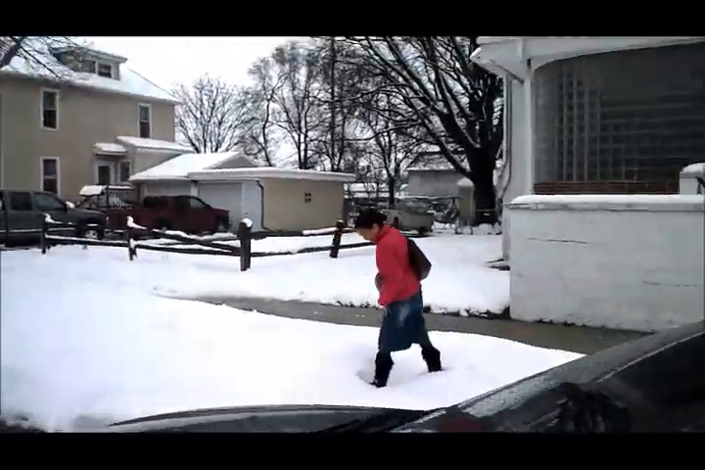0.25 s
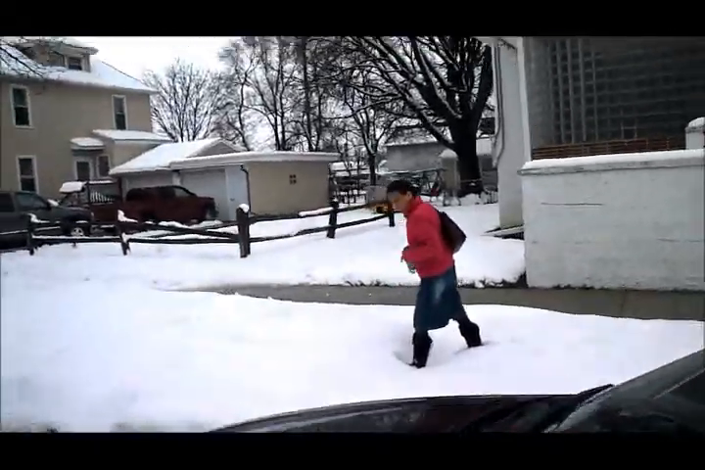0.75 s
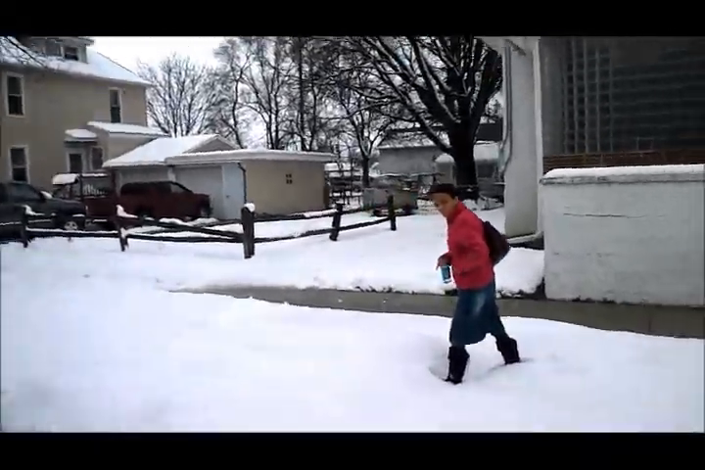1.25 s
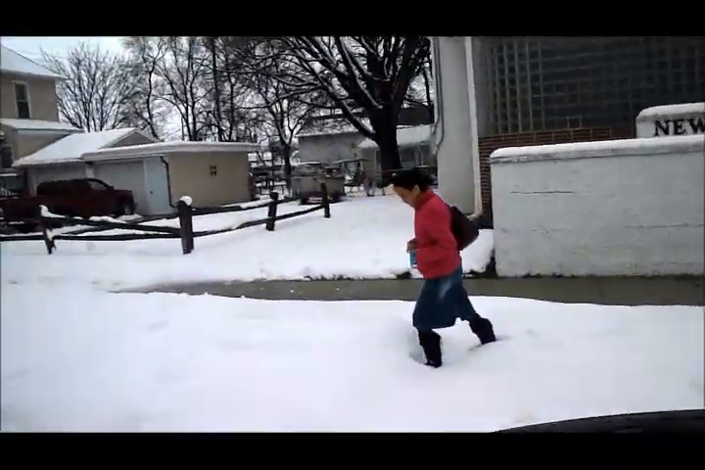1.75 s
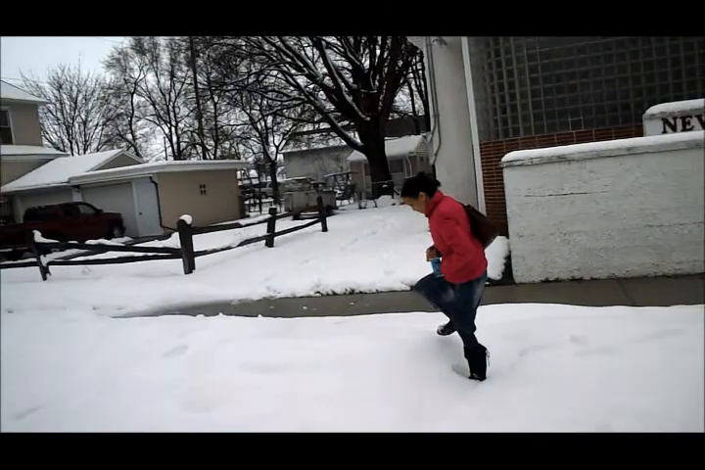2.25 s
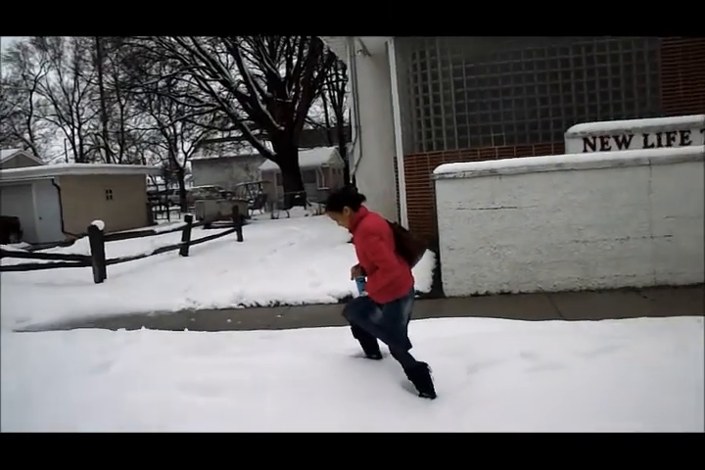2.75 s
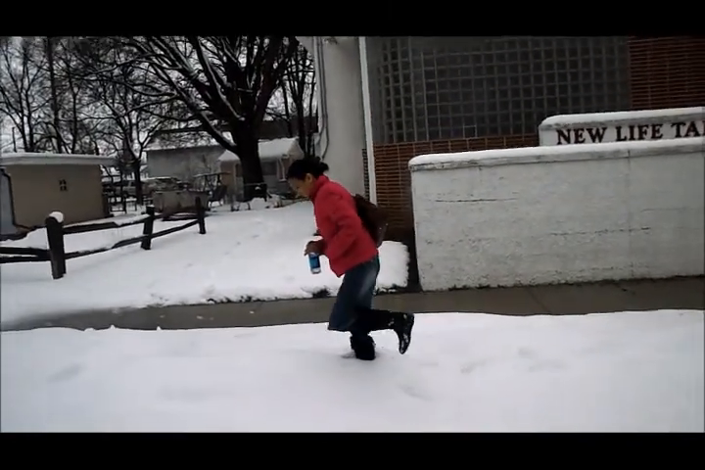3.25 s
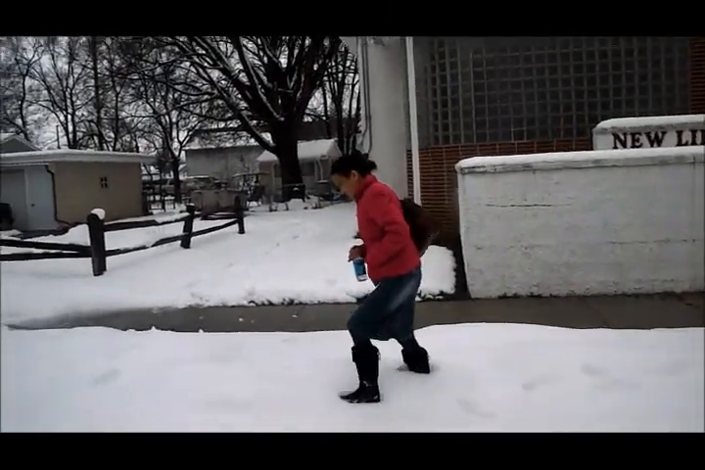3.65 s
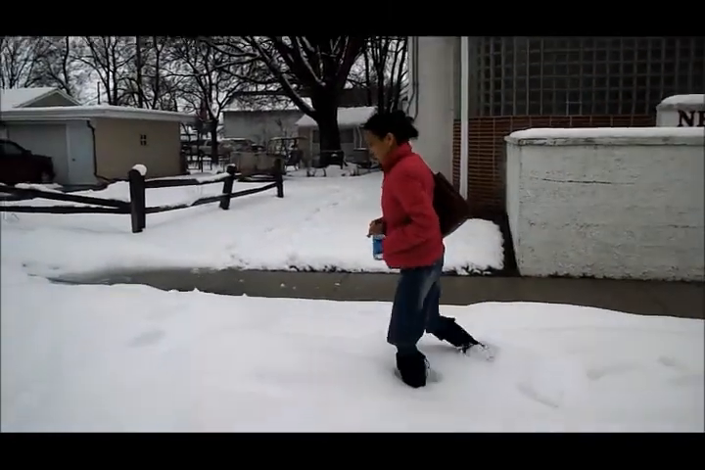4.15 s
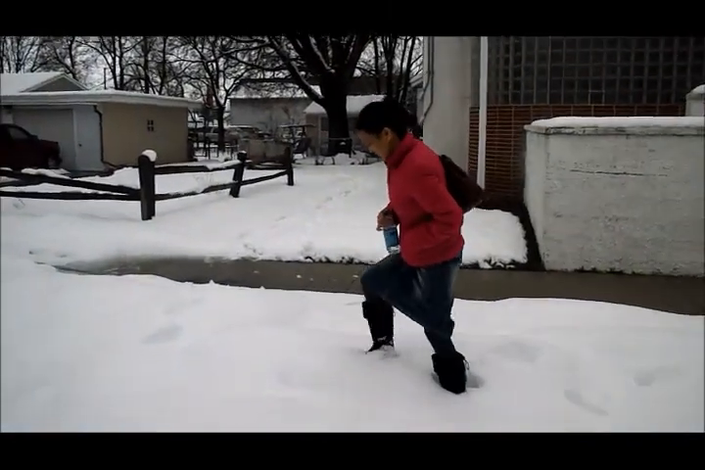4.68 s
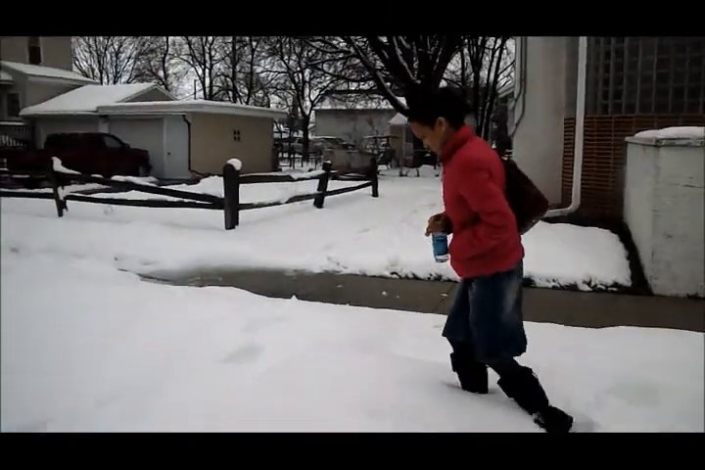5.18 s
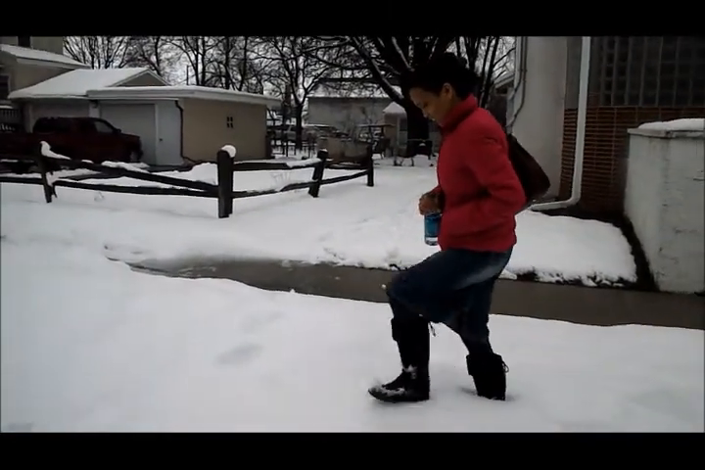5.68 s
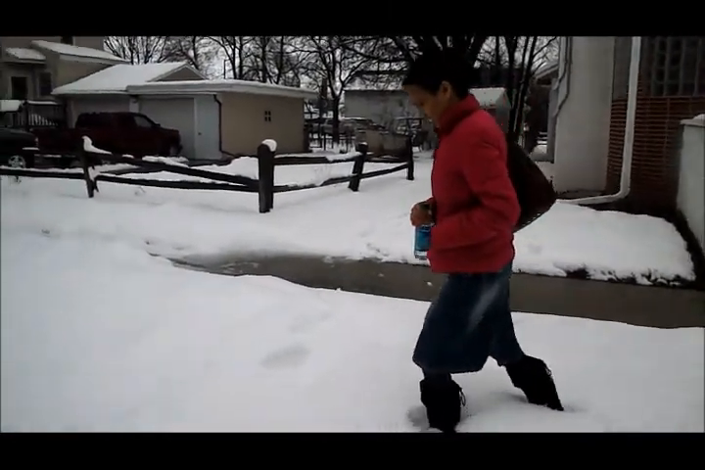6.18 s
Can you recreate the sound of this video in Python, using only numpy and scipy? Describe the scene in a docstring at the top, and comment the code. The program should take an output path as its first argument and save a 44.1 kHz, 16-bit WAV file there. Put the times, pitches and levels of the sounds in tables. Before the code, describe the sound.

A quiet snowy yard heard through a small hand-held mono microphone, with constant soft hiss, little bass and a very faint, thin high whine. At 0 s a distant bird slurs downward, followed by short chirps at 0.2-0.4 s and rising whistles until about 0.7 s, lightly echoing; weaker whistles come near 1.4 s. Boots crunch softly in snow around 0.15, 1.2-1.7, 1.8, 2.2, 2.6 and 2.9 s, grainy and muffled. A faint low hum swells in and out between 0.7 and 2 s. Close plastic case ticks punctuate everything: a strong click at 1.43 s, others near 2.1, 2.3, 3.6, 4.4, 5.5 and 5.9 s. From 4 s birds return with chirps, a whistle and another falling slur at 5 s, fading by 5.6 s. Fingers rub the case faintly from 4.7 s, then scratch more sharply at 5.4 and 6.2 s. A last tick comes at 6.4 s.

```python
"""A quiet yard in deep snow, heard through a hand-held camera: boots crunch softly as swarms of grains.
Close by, the plastic case ticks as struck decaying modes and rubs under the fingers as ringing jerks.
Far birds slur, chirp and whistle as gliding sines with echoes; narrow noise makes a low hum that comes
and goes. The mono microphone adds shaped hiss, and the electronics a thin chopped sine whine."""
import sys
import numpy as np
from scipy import signal
from scipy.fft import rfft, irfft
from scipy.io import wavfile
from scipy.ndimage import uniform_filter1d

SR = 44100
rng = np.random.default_rng(int(sys.argv[2]) if len(sys.argv) > 2 else 0)


def generate_wav(sig):
    """Save sig (samples, or channels by samples) to the path in sys.argv[1] as 16-bit PCM at SR."""
    pcm = np.round(np.clip(np.atleast_2d(sig).T, -1, 1) * 32767).astype(np.int16)
    wavfile.write(sys.argv[1], SR, pcm)


N = 283154
TIME = np.arange(N) / SR


def undb(db):
    """Decibels to gain."""
    return 10 ** (np.asarray(db) / 20)


def level(x, db):
    """Scale to an rms level in dB."""
    return x * undb(db) / np.sqrt(np.mean(x ** 2) + 1e-18)


def add(out, s, x):
    """Mix x into out from time s (seconds) on."""
    i = max(int(s * SR), 0)
    out[i:i + len(x)] += x[:max(len(out) - i, 0)]


def colour(x, points):
    """Filter by a (Hz, dB) outline, joined up along log frequency."""
    hz, db = np.transpose(points)
    f = np.maximum(np.fft.rfftfreq(len(x), 1 / SR), 1)
    gain = undb(np.interp(np.log(f), np.log(hz), db))
    return irfft(rfft(x) * gain, len(x))


def resonate(x, hz, width):
    """One steep-sided resonance, gain 1 at its centre: a peak of this width in Hz, passed twice."""
    b, a = signal.iirpeak(hz, hz / width, fs=SR)
    once = signal.lfilter(b, a, x)
    return signal.lfilter(b, a, once)


def walk(rate):
    """Slow random drift around 0 with a spread near 1, heading for `rate` new values a second."""
    k = int(SR / rate)
    held = np.repeat(rng.standard_normal(N // k + 1), k)
    return uniform_filter1d(held, k)[:N]


def grains(n, rate, spread_db):
    """Random tiny impulses, `rate` a second on average, most weak and a few strong."""
    struck = rng.random(n) < rate / SR
    strength = undb(spread_db * np.minimum(rng.exponential(size=n), 4))
    return struck * rng.choice([-1, 1], n) * strength


def arch(length):
    """Progress 0-1 through an event of this many seconds, and a rounded swell over it."""
    u = np.linspace(0, 1, max(int(length * SR), 8))
    return u, np.abs(np.sin(np.pi * u))


def note(hz, swell, db, waver=0.00403, flutter_db=2):
    """One pure bird note; its pitch wavers slightly and its level flutters on the way through the air."""
    hz = hz * (1 + waver * walk(200)[:len(hz)])
    swell = swell * undb(flutter_db * walk(60)[:len(hz)])
    return np.sqrt(2) * undb(db) * swell * np.sin(2 * np.pi * np.cumsum(hz) / SR)


def bird_calls():
    """Pure gliding notes: long downward slurs, short chirps and rising whistles."""
    # A bird's long downward slurs. Each row: reference time in seconds, level in dB.
    slurs = [(-0.012, -41.5), (5.008, -42.5)]
    # Every slur hangs high, drops fast and settles.
    # Each row: seconds from the reference time, pitch in Hz, level in dB relative to the slur's.
    slur_shape = [(-0.05, 4880, -9), (-0.012, 4670, -4), (0.018, 4560, -13), (0.04, 4480, 3.5),
                  (0.056, 4060, -1), (0.075, 3650, -14.5), (0.11, 3300, -10), (0.135, 3280, -8.5),
                  (0.16, 3250, -13)]
    # Short chirps. Each row: start in seconds, length in seconds, starting pitch in Hz,
    # glide in octaves, level in dB.
    chirps = [(0.24, 0.022, 4400, -0.21, -46), (0.349, 0.024, 4920, -0.21, -36),
              (4.013, 0.029, 4500, -0.256, -48), (4.37, 0.058, 4640, -0.25, -38),
              (4.575, 0.042, 4038, -0.22, -46), (5.266, 0.044, 3150, -0.28, -49.5),
              (5.342, 0.06, 2313, 0.47, -45)]
    chirp_bend = 1.57  # a chirp's glide steepens as it goes
    # Rising whistles. Each row: start in seconds, length in seconds, starting pitch in Hz,
    # rise in octaves, level in dB.
    whistles = [(0.465, 0.04, 3176, 0.01, -45.5), (0.526, 0.16, 3300, 0.16, -46.5),
                (0.602, 0.125, 3303, 0.1, -39), (1.415, 0.057, 3285, 0.03, -49),
                (1.479, 0.071, 3053, 0.058, -53.5), (4.659, 0.111, 3160, 0.047, -50.5),
                (5.485, 0.14, 3170, 0.01, -59)]
    whistle_ease, whistle_late = 2.4, 2.65  # the rise levels off; the loudness comes late

    out = np.zeros(N)
    at, pitch_hz, shape_db = np.transpose(slur_shape)
    for s, db in slurs:
        t = TIME - s
        swell = np.interp(t, at, undb(shape_db), left=0, right=0)
        out += note(np.interp(t, at, pitch_hz), swell, db)
    for s, length, hz, glide_oct, db in chirps:
        u, swell = arch(length)
        pitch = hz * 2 ** (glide_oct * u ** chirp_bend)
        add(out, s, note(pitch, swell ** 0.99, db))
    for s, length, hz, rise_oct, db in whistles:
        u, _ = arch(length)
        swell = np.abs(np.sin(np.pi * u ** whistle_late)) ** 0.44
        pitch = hz * 2 ** (rise_oct * (1 - (1 - u) ** whistle_ease))
        add(out, s, note(pitch, swell, db))
    return out


def birds(wall_s=0.022, wall_db=-12, echo_db=-5, echo_t60=0.69):
    """The calls, thrown back once by a house wall and scattered by the trees into a decaying noise tail."""
    calls = bird_calls()
    t = TIME[:SR // 2]
    trees = rng.standard_normal(len(t)) * np.exp(-np.log(1000) * t / echo_t60)
    scattered = signal.fftconvolve(calls, trees / np.linalg.norm(trees))[:N]
    heard = calls + undb(echo_db) * scattered
    add(heard, wall_s, undb(wall_db) * calls)
    return heard


def air(hiss_db=-44.8, port_hz=1980, port_width_hz=480, port_db=-52.0):
    """Outdoor air and microphone hiss, with a hump where the microphone's port resonates."""
    # Colour of the hiss. Each row: frequency in Hz, relative density in dB.
    hiss_colour = [(25, -55.5), (60, -32.5), (125, -26), (260, -18), (480, -11), (780, -6), (1400, -4.5),
                   (2700, -8.5), (3600, -6), (4700, -2), (5500, -5.5), (6500, -4), (7800, -9),
                   (10100, -9.5), (11000, -20)]
    hiss = level(colour(rng.standard_normal(N), hiss_colour), hiss_db)
    port = resonate(rng.standard_normal(N), port_hz, port_width_hz)
    return (hiss + level(port, port_db)) * undb(0.23 * walk(5.7))  # the level drifts very slightly


def whine(hz=10740, chop_hz=81.7, line_db=-70):
    """A thin sine from the camera's electronics, chopped at a steady rate."""
    chop = 1 + np.cos(2 * np.pi * chop_hz * TIME)
    return np.sqrt(2) * undb(line_db) * chop * np.sin(2 * np.pi * hz * TIME)


def boots():
    """Snow crystals break in a swarm as the weight comes onto each boot."""
    # A boot packs the snow. Each row: start in seconds, length in seconds, level in dB.
    steps = [(0.152, 0.13, -55.5), (1.181, 0.52, -53.5), (1.818, 0.026, -45.5), (2.181, 0.0304, -47),
             (2.233, 0.05, -46), (2.596, 0.312, -52), (2.92, 0.24, -48)]
    # Colour of packing snow. Each row: frequency in Hz, relative level in dB.
    snow = [(30, -53), (100, -24), (300, -17.5), (550, -1.5), (850, 1.5), (1300, -0.5), (2200, -11.5),
            (4500, -16), (10000, -28)]
    weight = np.zeros(N)
    for s, length, db in steps:
        u, _ = arch(length)
        press = np.abs(np.sin(np.pi * u ** 1.246)) ** 0.487  # peaks a little past the middle
        add(weight, s, undb(db) * press)
    crunch = level(colour(grains(N, rate=1600, spread_db=2.5), snow), 0)
    return weight * crunch * undb(4.1 * walk(70))  # the snow gives way in fits


def case_ticks(rebound_s=0.000836, rebound=0.387, low_hz=600, skirt_db_per_oct=19.5, round_oct=0.36,
               snap_top_hz=8600, thud_hz=890, thud_steep=4.3, place_db=3):
    """A seam of the case snaps and rebounds, driving modes near its pitch; the panel gives with a thud."""
    # Modes of the plastic case. Each row: pitch in Hz, 60 dB decay time in seconds, relative level in dB.
    modes = [(766.4, 0.03, -6), (1052, 0.015, -5), (1265, 0.0178, -1), (1570, 0.0085, 4.5),
             (1949, 0.012, 2), (2207.6, 0.011, 0.5), (2967, 0.005, 3.5), (4170, 0.0096, 0),
             (5090, 0.0083, -0.5), (6294, 0.0035, 7.5), (8360, 0.00206, 11)]
    # Ticks of the case. Each row: start in seconds, snap drive in dB, pitch of the snap in Hz,
    # thud drive in dB, place along the seam 0-1.
    ticks = [(0.4708, -32.5, 2290, -28, 0.444), (1.0722, -28.5, 1730, -43.0, 0.448),
             (1.3699, -28.5, 3180, -54.5, 0.482), (1.4338, -2.5, 3230, -11.7, 0.35),
             (1.4955, -16.2, 3070, -26, 0.366), (1.9504, -17.5, 3300, -20.5, 0.048),
             (2.0893, -8, 3040, -52.9, 0.368), (2.1725, -30.5, 3950, -37.5, 0.135),
             (2.3111, -21.5, 2920, -25, 0.178), (2.3282, -13.5, 2155, -34.5, 0.461),
             (2.909, -27, 3780, -53.8, 0.182), (3.5615, -14.7, 3450, -61.0, 0.249),
             (3.7358, -30.5, 3940, -58.6, 0.14), (3.9646, -25, 3330, -22, 0.19),
             (4.2216, -25.5, 2810, -49, 0.54), (4.4117, -14.5, 2200, -30, 0.236),
             (4.5033, -30, 3080, -36, 0.352), (4.5628, -24, 3770, -10.5, 0.14),
             (4.92, -33, 4190, -22.5, 0.04), (5.0049, -35, 4590, -30, 0.4),
             (5.4945, -17.5, 3580, -23.0, 0.32), (5.5612, -13.5, 3520, -53.5, 0.24),
             (5.8581, -21.5, 3770, -32, 0.232), (5.9378, -12.5, 3150, -60.8, 0.369),
             (6.24, -25.5, 4600, -58.5, 0.37), (6.408, -23, 3500, -36.4, 0.14)]
    # Anti-resonances of the path from case to microphone. Each row: centre in Hz, width in Hz.
    notches = [(1750, 103), (2810, 166), (5600, 300)]

    out, t = np.zeros(N), TIME[:SR // 16]
    hz, t60, db = np.transpose(modes)
    rings = np.sin(2 * np.pi * hz[:, None] * t) * np.exp(-np.log(1000) * t / t60[:, None])
    polarity = (-1) ** np.arange(len(hz))  # neighbouring modes swing opposite ways at the microphone
    for s, snap_db, snap_hz, thud_db, place in ticks:
        # distance from the snap's pitch, with a rounded peak
        off_oct = np.hypot(round_oct, np.log2(hz / snap_hz)) - round_oct
        seam = undb(snap_db - skirt_db_per_oct * off_oct) / np.sqrt(1 + (hz / snap_top_hz) ** 10)
        panel = undb(thud_db) / np.sqrt(1 + (hz / thud_hz) ** thud_steep)
        # a mode rings most if the snap falls on one of its bellies
        belly = np.cos(2 * np.pi * place * (1 + np.arange(len(hz))))
        strength = polarity * undb(db + place_db * belly) * (seam + panel)
        snap = strength @ rings
        add(out, s, snap)
        add(out, s + rebound_s, rebound * snap)
    for notch_hz, width in notches:
        b, a = signal.iirnotch(notch_hz, notch_hz / width, fs=SR)
        out = signal.lfilter(b, a, out)
    # so small a shell gives off little bass
    return signal.sosfilt(signal.butter(2, low_hz, "high", fs=SR, output="sos"), out)


def low_hum(hz=280, width_hz=55):
    """A faint, unsteady low note, made of noise in a narrow resonance, swells and fades."""
    # Swells of the hum. Each row: start in seconds, length in seconds, level in dB at the top.
    hums = [(0.728, 0.159, -62), (1.1, 0.41, -61.5), (1.806, 0.073, -60), (1.977, 0.054, -53.5)]
    swell = np.zeros(N)
    for s, length, db in hums:
        add(swell, s, undb(db) * arch(length)[1])
    return swell * level(resonate(rng.standard_normal(N), hz, width_hz), 0)


def finger_rubs(dulling_db_per_oct=3.5):
    """Skin sticks and slips in dense jerks that ring the case; each slip starts bright, then dulls."""
    # A finger slips on the case. Each row: start in seconds, length in seconds, level in dB,
    # tilt in dB per octave at the middle of the slip.
    slips = [(4.718, 0.0136, -42.5, 3.5), (4.829, 0.068, -45, 15.5), (4.988, 0.0115, -43, 5.5),
             (5.41, 0.02, -29, 2.5), (5.435, 0.0058, -35, 2.5), (5.456, 0.038, -35.5, 5),
             (5.5, 0.0052, -34, -1), (5.814, 0.19, -49.5, 14), (6.175, 0.00584, -32.5, 4),
             (6.186, 0.022, -39.5, 5), (6.208, 0.0092, -30.5, 1)]
    # Resonances that rubbing brings out. Each row: pitch in Hz, width in Hz, relative level in dB.
    rub_modes = [(805, 126, 4.5), (2141, 620, 4.5), (3280, 520, -1), (5110, 2800, -6.5), (8440, 370, -14)]
    out = np.zeros(N)
    for s, length, db, tilt_db in slips:
        u, swell = arch(length)
        jerks = grains(len(u), rate=3600, spread_db=2.5) * swell ** 0.084
        slope_db = tilt_db + dulling_db_per_oct * (.5 - u)  # the tilt falls along the slip
        rub = 0
        for hz, width, mode_db in rub_modes:
            drive = jerks * undb(mode_db + slope_db * np.log2(hz / 2000))
            rub = rub + resonate(np.pad(drive, (0, SR // 50)), hz, width)  # room to ring out
        # the level counts over the slip itself, not the added ring-out time
        add(out, s, level(rub, db) * np.sqrt(len(u) / len(rub)))
    return out


def scene():
    """Everything reaches one microphone, which feeds both channels."""
    mono = birds() + air() + whine() + boots() + case_ticks() + low_hum() + finger_rubs()
    return np.array([mono, mono])


def record(dry, bass_hz=45, top_hz=11000):
    """The camera clips at full scale, drops the deepest bass and cuts the top octave."""
    clipped = np.clip(dry, -1, 1)
    thin = signal.sosfilt(signal.butter(1, bass_hz, "high", fs=SR, output="sos"), clipped)
    top = signal.ellip(10, .2, 80, top_hz, fs=SR, output="sos")  # 0.2 dB ripple, 80 dB down above
    return signal.sosfilt(top, thin)


dry = scene()
out = record(dry)
generate_wav(out)
```